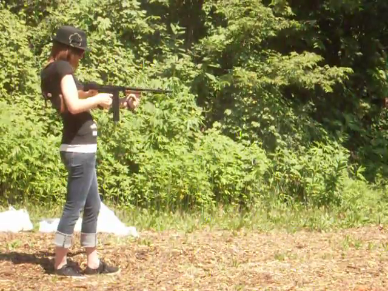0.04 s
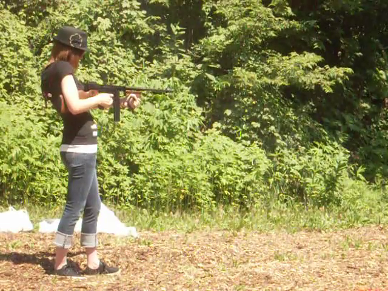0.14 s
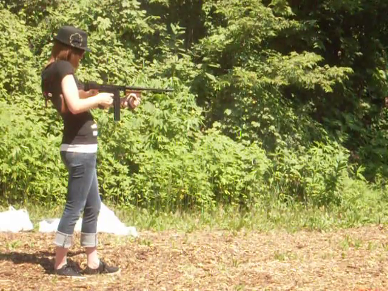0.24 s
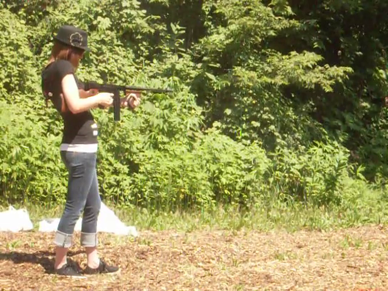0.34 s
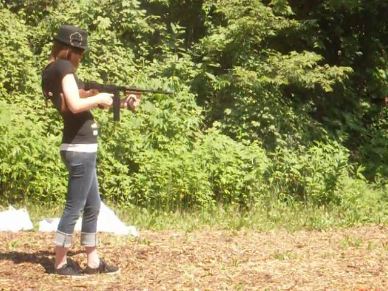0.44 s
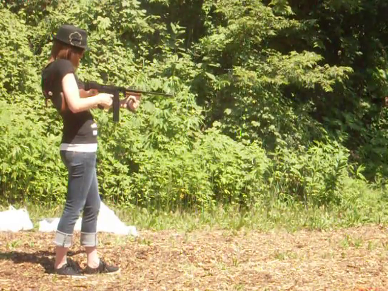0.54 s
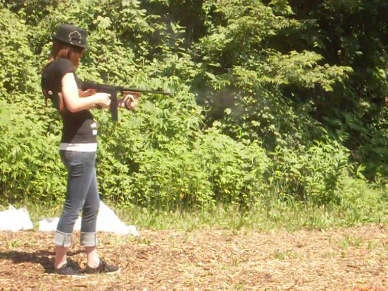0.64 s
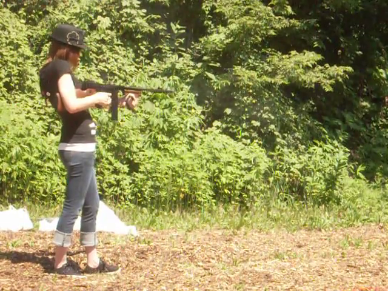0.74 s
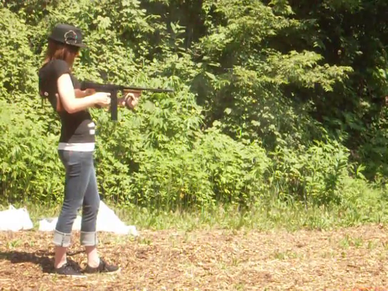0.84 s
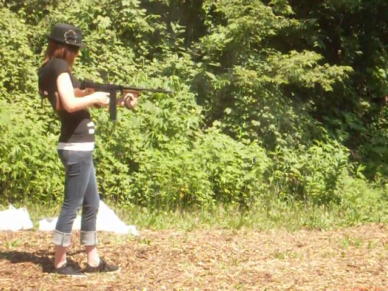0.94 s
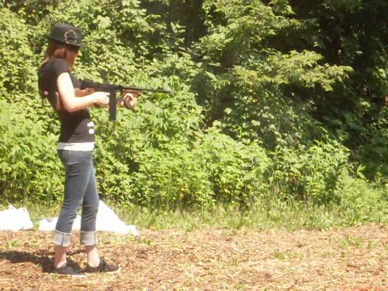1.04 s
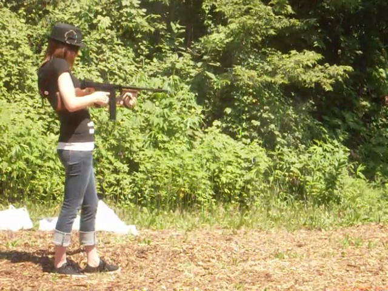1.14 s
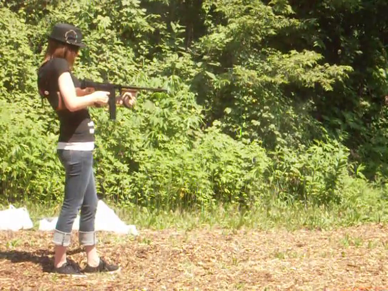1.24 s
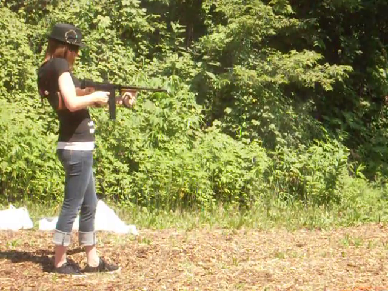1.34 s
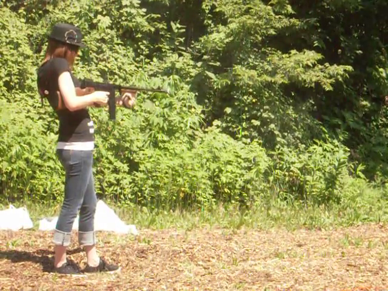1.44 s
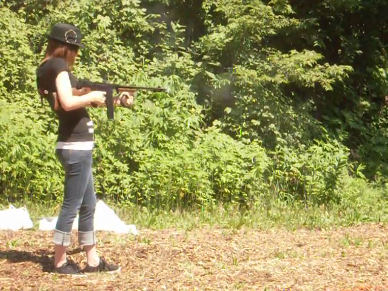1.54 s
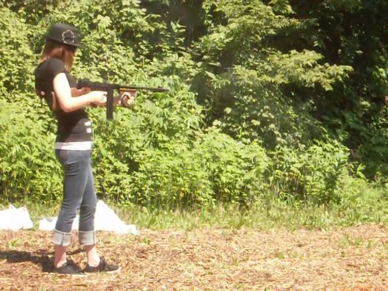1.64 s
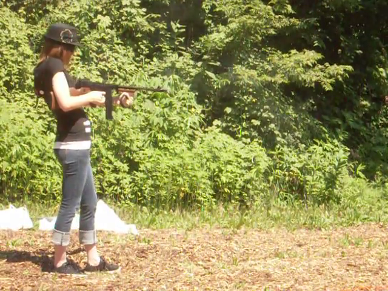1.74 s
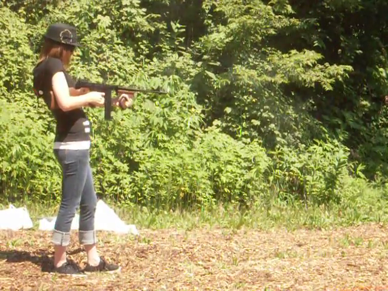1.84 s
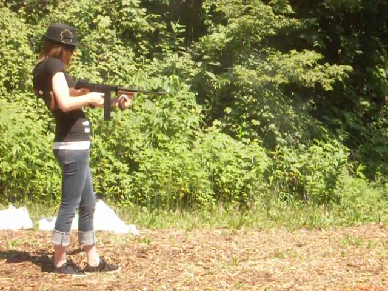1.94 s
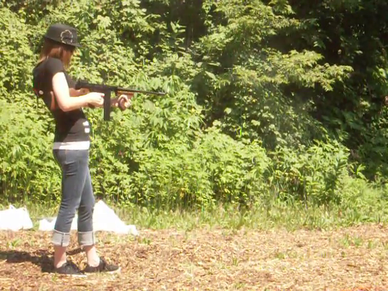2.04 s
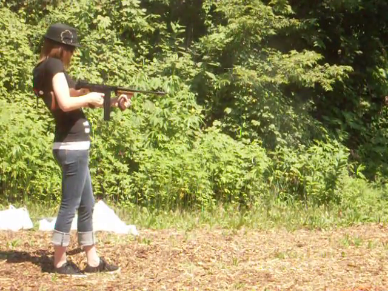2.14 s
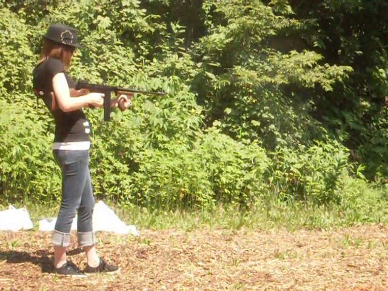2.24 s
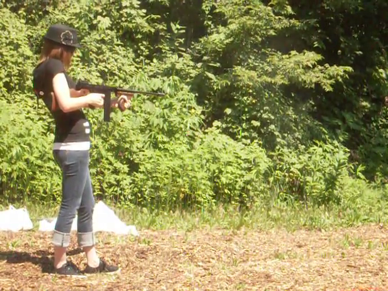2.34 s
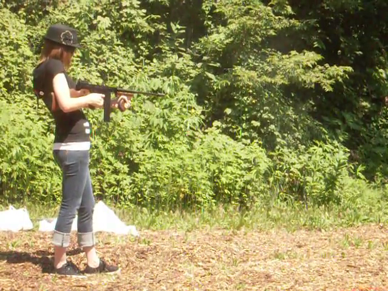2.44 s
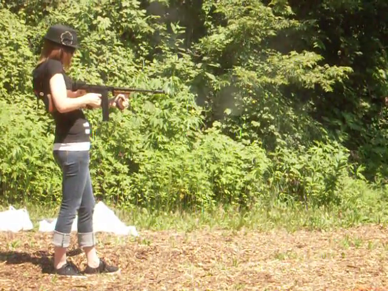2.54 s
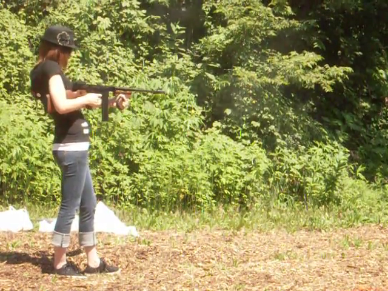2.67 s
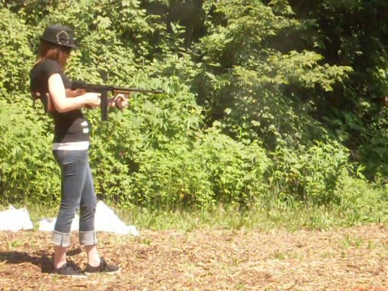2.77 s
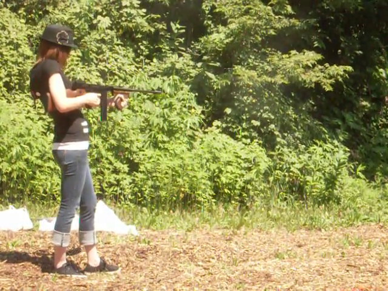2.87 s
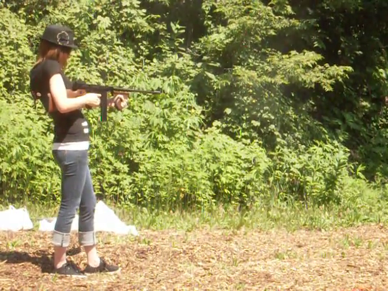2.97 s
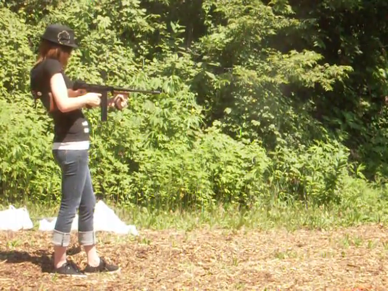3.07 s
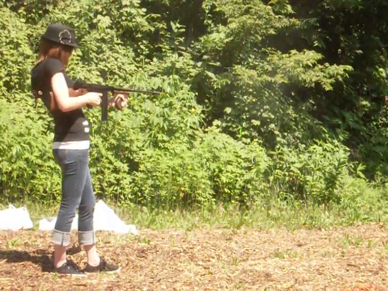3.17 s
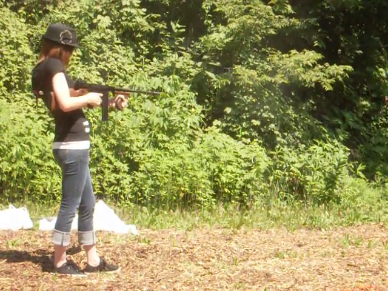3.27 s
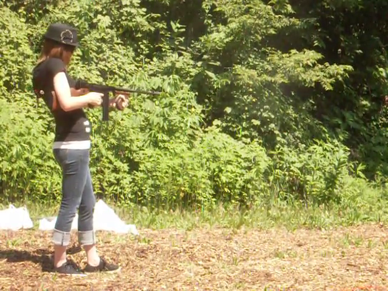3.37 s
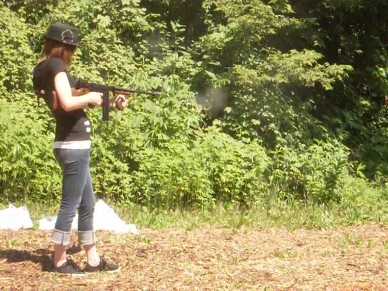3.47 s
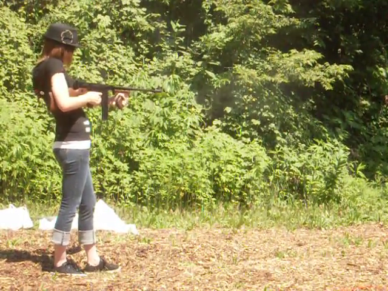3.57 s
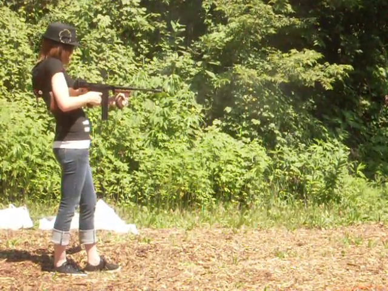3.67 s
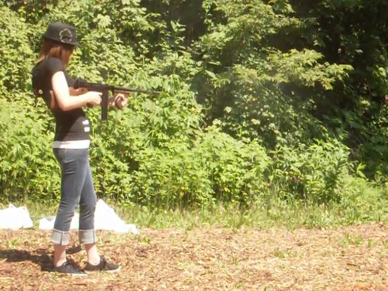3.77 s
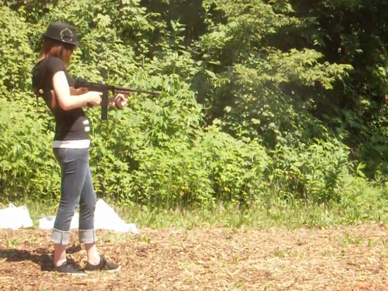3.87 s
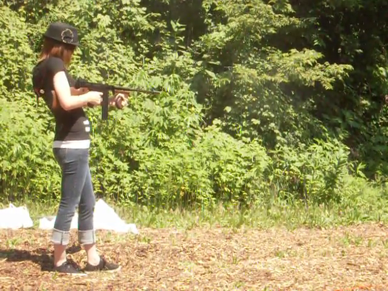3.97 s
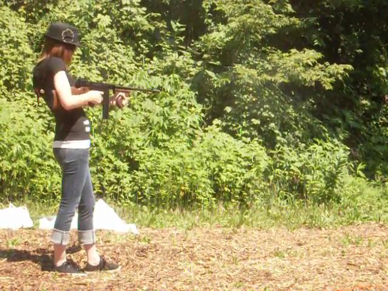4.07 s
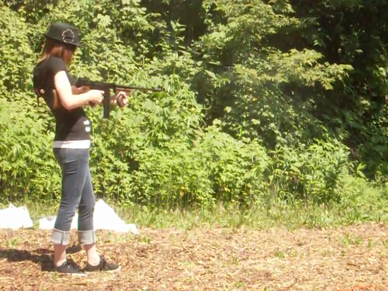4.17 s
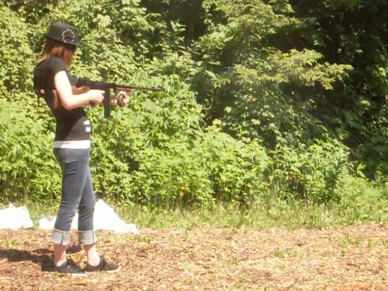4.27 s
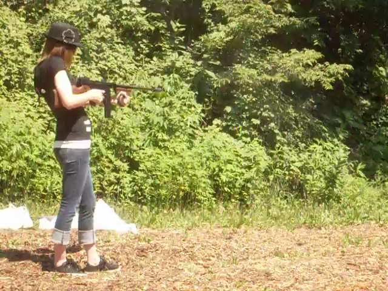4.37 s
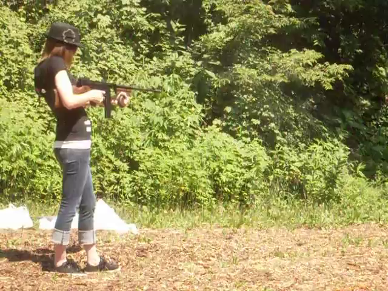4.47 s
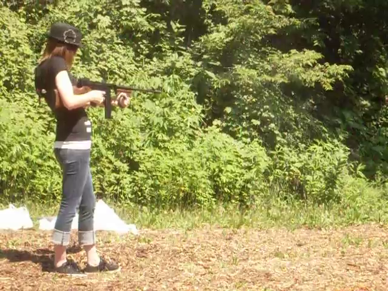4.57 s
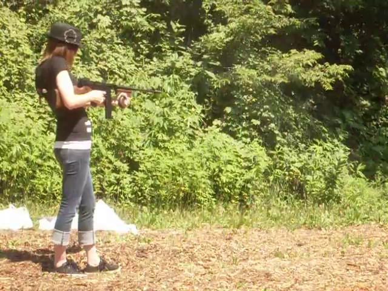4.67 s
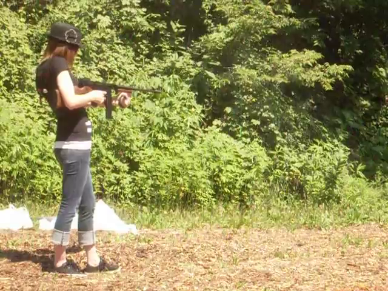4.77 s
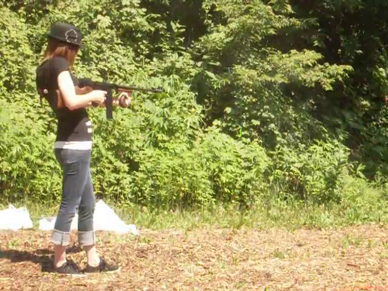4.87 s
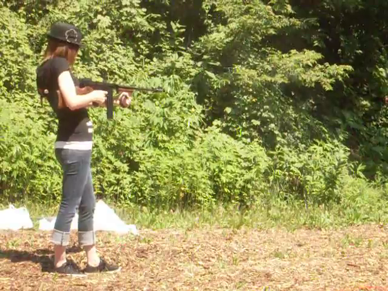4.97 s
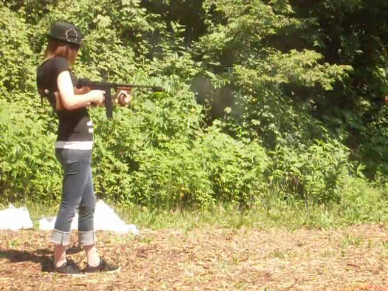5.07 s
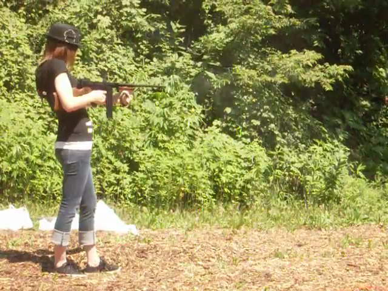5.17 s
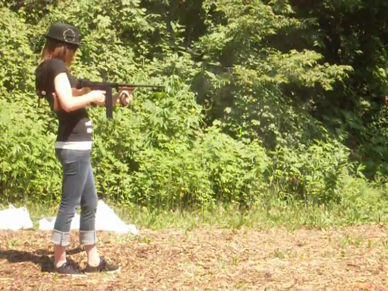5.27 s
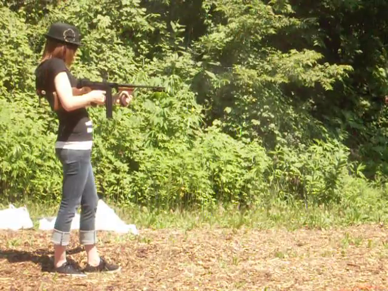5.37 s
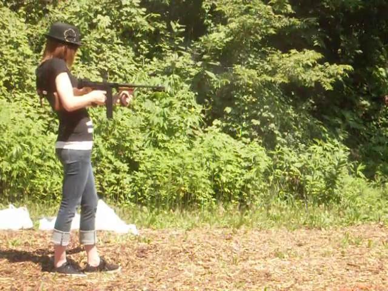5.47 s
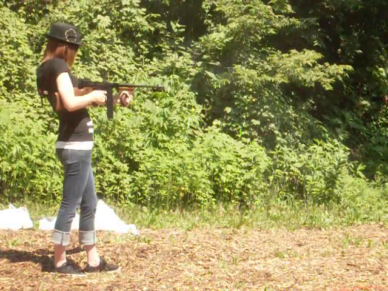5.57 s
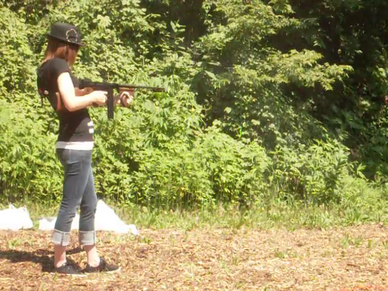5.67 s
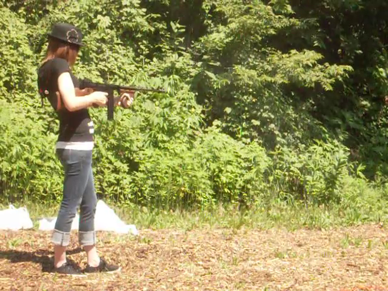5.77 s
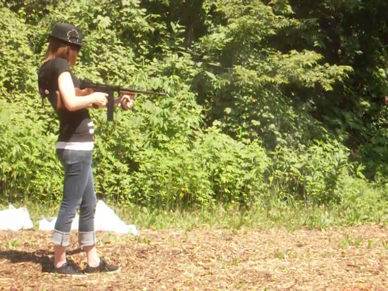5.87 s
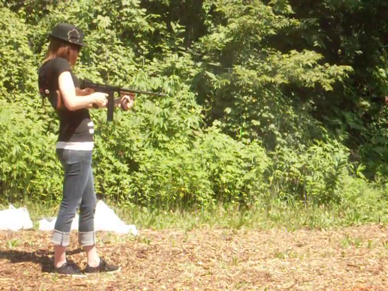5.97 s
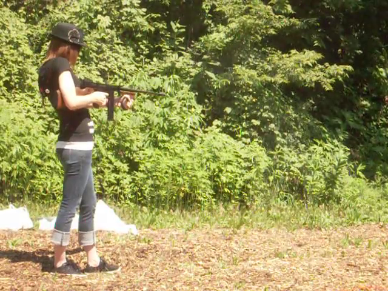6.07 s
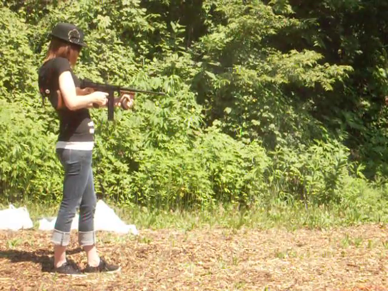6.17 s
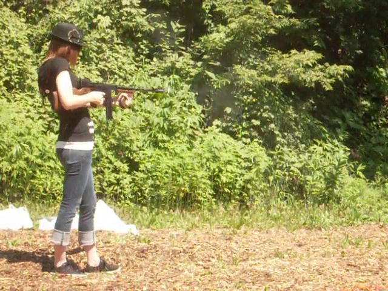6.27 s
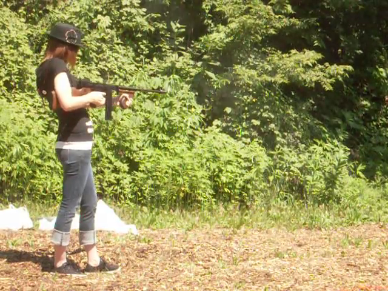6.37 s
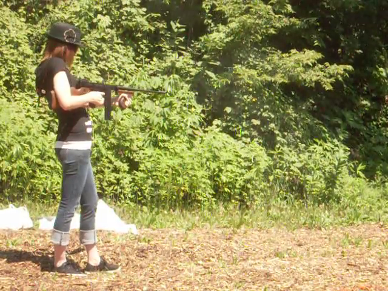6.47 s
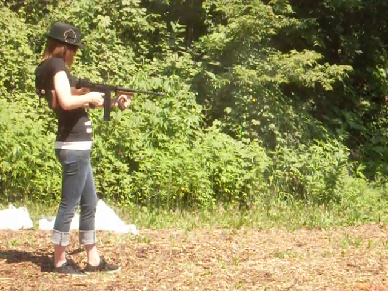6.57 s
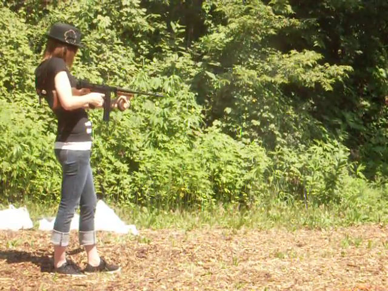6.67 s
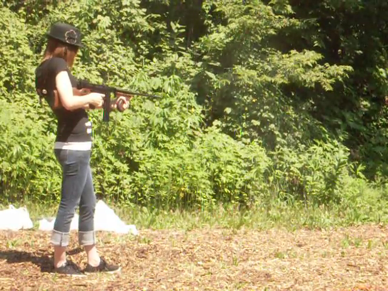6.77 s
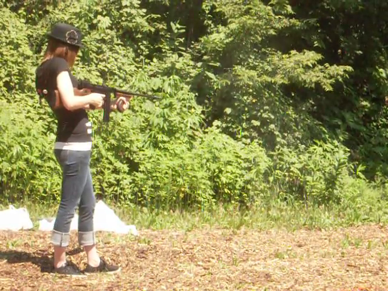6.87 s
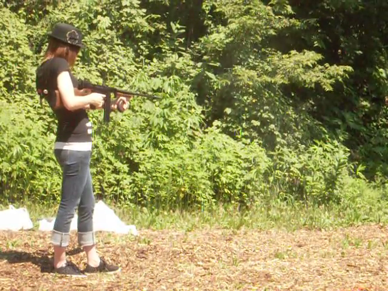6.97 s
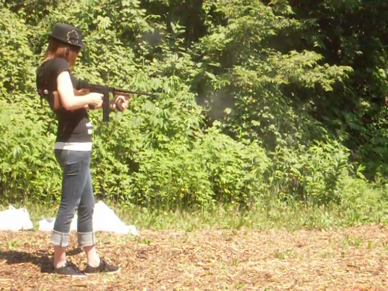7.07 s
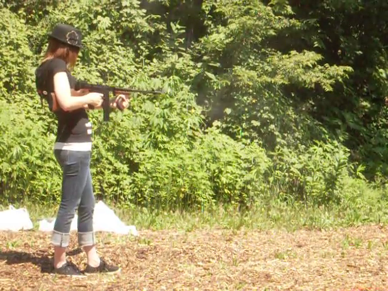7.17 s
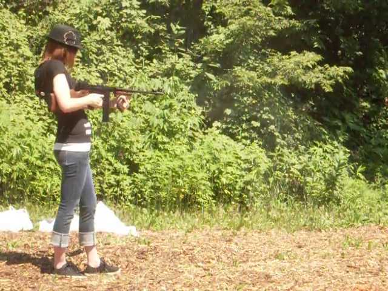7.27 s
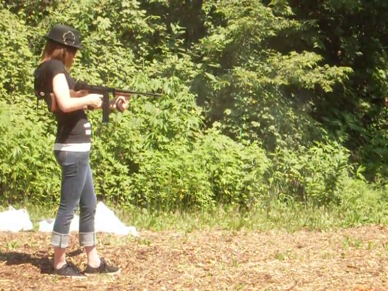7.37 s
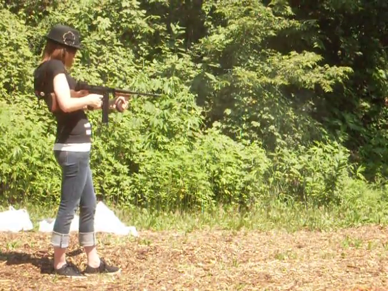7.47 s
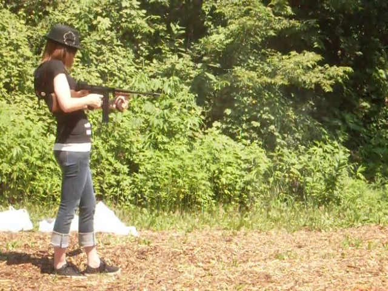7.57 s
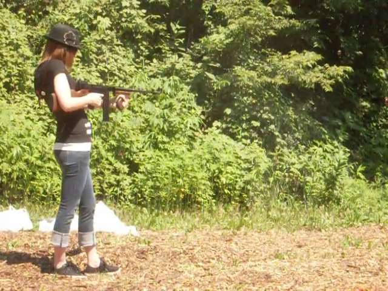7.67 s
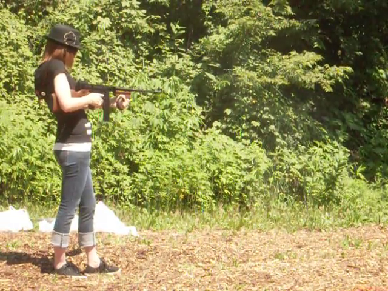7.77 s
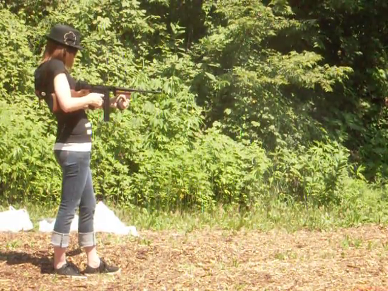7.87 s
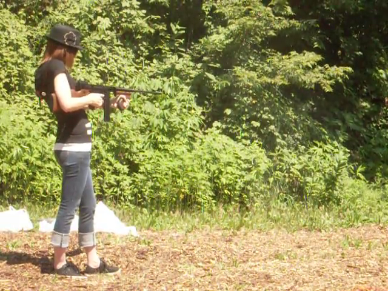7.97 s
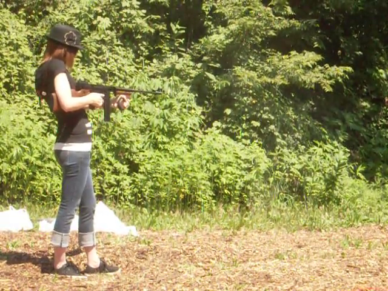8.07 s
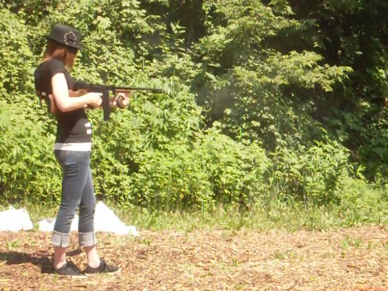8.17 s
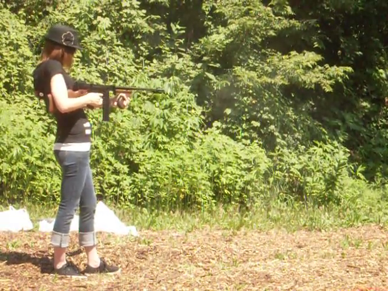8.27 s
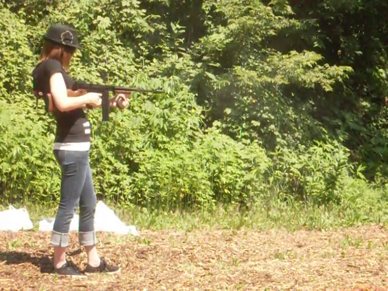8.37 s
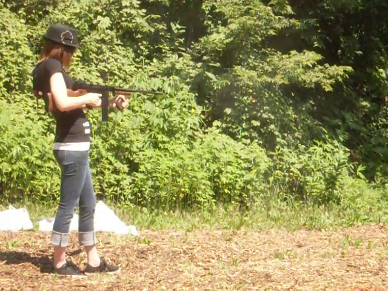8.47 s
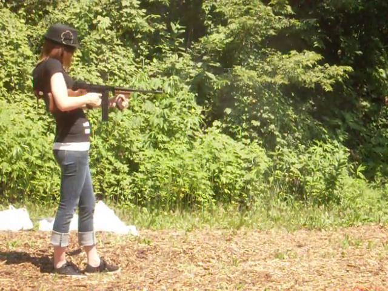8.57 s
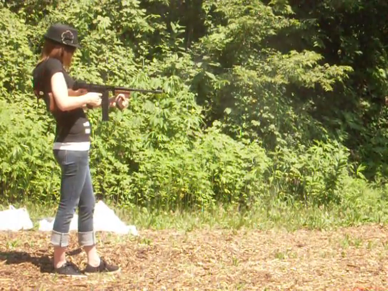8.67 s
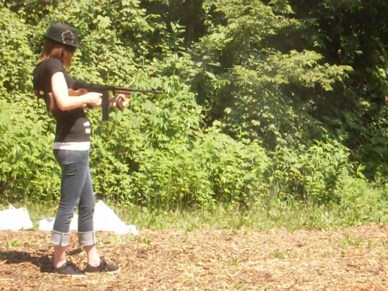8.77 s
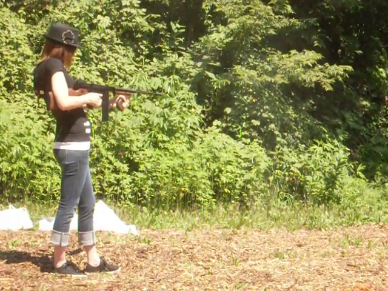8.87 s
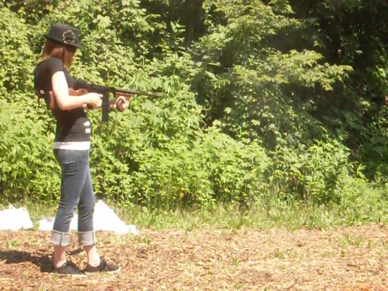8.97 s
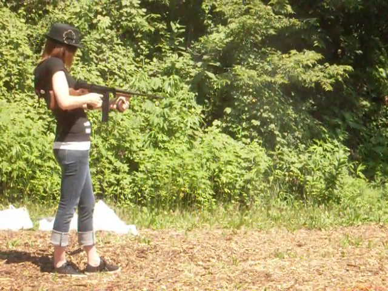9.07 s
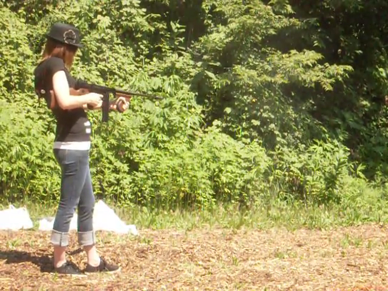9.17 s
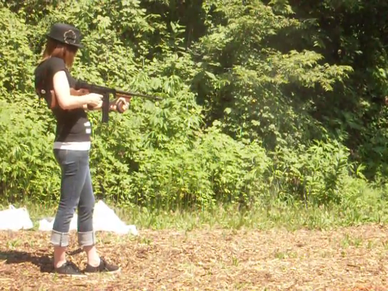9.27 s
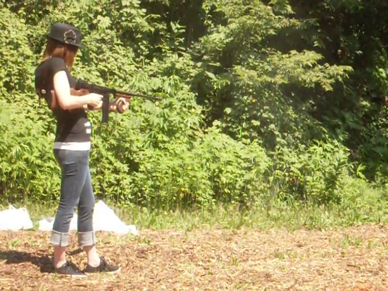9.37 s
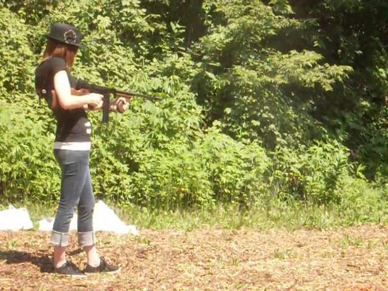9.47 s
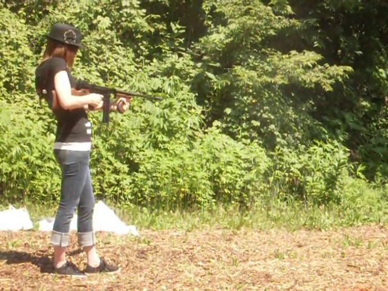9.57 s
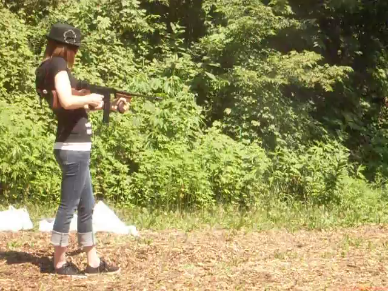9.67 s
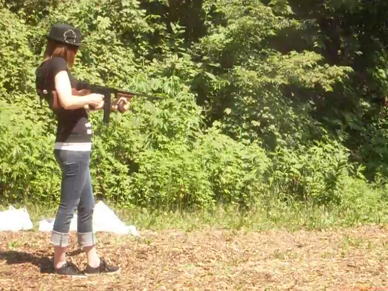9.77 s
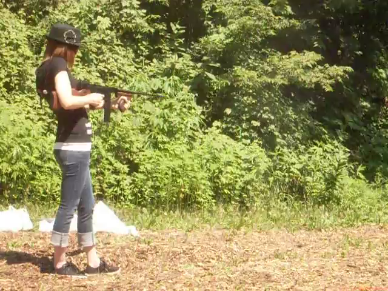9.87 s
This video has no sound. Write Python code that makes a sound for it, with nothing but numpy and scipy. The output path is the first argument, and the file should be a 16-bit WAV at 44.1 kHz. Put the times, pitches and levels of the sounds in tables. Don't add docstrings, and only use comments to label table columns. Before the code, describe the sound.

A short-barrelled gun fires eight separate sharp cracks outdoors, each echoing off bank and trees, over faint hiss and thin electronic whine.

```python
import sys
import numpy as np
from scipy import signal
from scipy.fft import rfft, irfft
from scipy.io import wavfile

SR = 44100
rng = np.random.default_rng(int(sys.argv[2]) if len(sys.argv) > 2 else 0)


def digitize_waveform(pressure):
    field = np.atleast_2d(pressure).T
    bounded = np.clip(field, -1, 1)
    quanta = np.round(bounded * 32767).astype(np.int16)
    wavfile.write(sys.argv[1], SR, quanta)


def volts_from_db(level):
    exponent = np.asarray(level, float) / 20
    return 10 ** exponent


N = 437022

# start in seconds, charge in dB, change of the bank's slap in dB, bullet strike in dB.
SHOTS = [
    (0.6747, -1.34, -0.5, -13),
    (1.5501, 0, -3.5, 1.5),
    (2.5483, -1.16, 0, -15.5),
    (3.5202, -1.45, -1, -7.5),
    (5.0934, -1.2, -2, -8),
    (6.2918, -0.9, -3, -1),
    (7.1345, -1.04, 0, -10.5),
    (8.148, -0.43, -2.5, -15.5),
]
# delay in seconds, thump in dB, thump pitch in Hz, thump t60 in seconds, crackle in dB.
MUZZLE = [(.0001, -5, 2189, .004, -3.5), (.0006, -9.5, 50.05, 0.063, -32), (.0008, -8, 139.1, .039, -29),
          (.0015, -6, 1764, 0.0033, -8), (.0027, 11.5, 762, .0078, -4.5), (.0038, -1, 1492, 0.018, -3),
          (.004, -17.5, 330, 0.046, -30.5), (.0004, -3, 3000, .006, -28.5)]
BANK = [(.0565, 2.5, 3000, 0.0065, -8.5), (.0564, -0.5, 1425, 0.012, -13), (.0568, 9, 984, 0.0062, -20.5),
        (.0594, -0.5, 820, 0.02, -24)]
# delay in seconds, thump in dB, thump pitch in Hz, crackle in dB.
NEARBY = [(.0073, -2, 906, -19.5), (0.0123, 3.5, 815, -28), (0.0114, -8, 3000, -6), (.0162, -0.5, 783, -8),
          (0.0239, -8.5, 804.7, -8), (0.0297, -16.5, 1100, -9.5), (.033, -4, 780, -13.5),
          (0.041, -21.5, 330, -21.5), (0.0507, -12.5, 1212, -18)]
# delay in seconds, size in dB, thump pitch in Hz.
TRUNKS = [(.097, 4, 850), (.125, 5, 1450), (0.135, -3.5, 1310), (.164, -2.5, 540), (.166, 5, 930),
          (0.168, -7, 1490), (.283, -4, 810), (0.304, 4, 1460), (.333, 1, 1500), (.358, 2, 900),
          (0.362, -2, 1500), (0.412, 1, 1330), (.418, -4, 790), (.447, -6, 850), (.488, -10, 950),
          (.516, -3, 1400), (0.571, 6, 1420), (.579, 1, 860), (.648, -7, 850), (.664, 8, 840),
          (.682, 3, 890)]
# pitch in Hz, share of power 0-1.
REPEATS = [(60, .8), (300, .93), (1000, .75), (2000, .38), (4000, .08), (8000, .02)]
# pitch in Hz, level in dB, hold after the blast in seconds, then t60 in seconds.
BUSHES = [(60, -36.5, .01, 0.26), (150, -35.5, 0.014, .35), (330, -33, 0.044, .3),
          (650, -30.5, 0.055, 0.46), (1590, -31, 0.083, .21), (3500, -22, 0.069, .3),
          (6800, -30.5, 0.032, .4), (11000, -22, 0.044, .4)]
# pitch in Hz, level in dB a quarter second after the blast, t60 in seconds.
FOREST = [(110, -66.5, 2.1), (300, -57, 1), (634, -48, 2.1), (1500, -46.5, 2.0), (2400, -46, 1.7),
          (4200, -46.5, 1.35), (6507, -56, 0.98), (11000, -53, .8)]
# time after the blast in seconds, half-width in seconds,
# level change in dB.
GAPS = [(.009, .003, -3.5), (.021, .003, -5), (0.048, 0.0076, 0), (0.065, .004, -3.5), (.092, .006, 3)]
# pitch in Hz, lift in dB, width in octaves.
GROUND = [(152, 2, 0.9), (850, 5, 0.13), (1500, 2.5, 0.18), (5600, 7.5, 0.27)]
# start in seconds, peak in dB, dull ring in Hz, brass ring in dB, bright tick in dB.
CASES = [(2.4513, -55.5, 3800, -30, -2), (4.179, -60, 2940, -30, .5), (5.855, -74, 4400, -24.5, 3),
         (6.0064, -52.5, 3770, -24, -11), (6.1675, -43.5, 4200, -40.5, -6),
         (7.0967, -56.5, 4500, -31.5, -2), (7.999, -52.5, 3800, -25, 7.5), (9.0413, -53, 4280, -30, -2),
         (9.2835, -52.5, 4320, 1, -7), (9.3214, -69, 4170, 8, -3)]
# pitch in Hz, level in dB, t60 in seconds.
BRASS = [(10900, -2.5, .17), (11150, -4.5, .17)]
# start in seconds, length in seconds, first pitch in Hz, last pitch in Hz, level in dB.
CHIRPS = [(1.45, 0.034, 3400, 4200, -63), (7.955, 0.023, 3400, 4200, -67), (8.027, 0.024, 2800, 2700, -67),
          (8.099, 0.025, 3390, 4300, -62), (9.48, .05, 3500, 3800, -74), (9.536, .025, 3100, 3270, -73),
          (9.712, .02, 3450, 2996, -71), (9.808, 0.023, 4300, 4080, -67.5), (9.82, .022, 3810, 3000, -67),
          (9.873, 0.041, 2910, 3700, -64)]
# pitch in Hz, rms level in dB.
TONES = [(2543.4, -87), (5086.8, -74.5), (8813, -86.5), (10173.6, -93.5)]
# time in seconds, pitch in Hz.
WHINE = [(0, 1924), (.28, 1806), (.53, 1840), (.58, 1420), (.65, 1585), (1.45, 1912), (4.3, 1706),
         (4.8, 1628), (5.06, 1772), (5.9, 1855), (6.14, 2087), (6.27, 1788), (8.06, 2004), (9.0, 1880),
         (9.44, 1942), (9.5, 2045), (9.67, 1837), (9.8, 2005)]
# frequency in Hz, density in dB per Hz.
AIR = [(20, 14), (150, 4), (500, 0.5), (1000, -1), (2200, -7), (5500, -12), (10300, -13), (12500, -30.5)]

STRIKE_S, STRIKE_HZ, STRIKE_T60_S = .0735, 846, .016
CRACKLE_T60_S = .011
NEARBY_CYCLES, TRUNK_CYCLES = 4.2, 25
TRUNK_DB, TRUNK_FADE_DB_PER_S = -13.5, 55
TRUNK_CRACKLE_DB, TRUNK_DULLING_DB_PER_S = -3, 155.5
LUMP_DB, LUMP_FADE_S, FAR_LUMP_DB = 2.4, .12, 1.1
SPREAD_DB, FOREST_EDGE_S = 4, 0.089
LEAF_RISE_S, LEAF_GAP_DB = 0.054, -6.5
BOLT_S, BOLT_DB = .0145, -56.5
TICK_HZ = 8300
CARRIER_HZ, BEAT_HZ, BEAT_TROUGH_S = 7643.4, 13.41, 4.738
AIR_DB = -69
OVERLOAD, SHAVE, ATTACK_S = .78, .74, .0025


def rms_one(x):
    return x / np.sqrt(np.mean(x ** 2, axis=-1, keepdims=True) + 1e-20)


def at_hz(points, hz):
    points = np.array(points)
    return np.interp(np.log(hz), np.log(points[:, 0]), points[:, 1])


def drift(rate_hz, size):
    r = np.exp(-2 * np.pi * rate_hz / SR)
    wander = signal.lfilter([1], [1, -2 * r, r * r], rng.standard_normal(size + SR))
    return rms_one(wander[SR:])


def ring(hz, t60_s, size):
    t = np.arange(size) / SR
    return np.sin(2 * np.pi * hz * t) * volts_from_db(-60 * t / t60_s)


def band(x, low_hz, high_hz):
    return signal.sosfilt(signal.butter(2, [low_hz, high_hz], "band", fs=SR, output="sos"), x)


def add(out, sound, start_s):
    at = round(start_s * SR)
    out[at:at + len(sound)] += sound[:len(out) - at]


def blast():
    out = np.zeros(N)
    t = np.arange(1800) / SR
    rows = arrivals()
    swell = 1 - np.exp(-t / 0.0004)
    for start_s, charge_db, slap_db, strike_db in SHOTS:
        strike = -volts_from_db(strike_db) * swell * ring(STRIKE_HZ, STRIKE_T60_S, len(t))
        add(out, strike, start_s + STRIKE_S)
        noise = rng.standard_normal((len(rows), len(t)))
        crackle = rms_one(band(noise, 1000, 9800)) * volts_from_db(-60 * t / CRACKLE_T60_S)
        vary = rng.standard_normal((len(rows), 2))
        for k, (row, burst, (gain, shift)) in enumerate(zip(rows, crackle, vary)):
            delay_s, thump_db, hz, t60_s, crackle_db = row
            thump = -swell * ring(hz * (1 + 0.0077 * shift), t60_s, len(t))
            sound = volts_from_db(thump_db + 0.75 * gain) * thump + volts_from_db(crackle_db) * burst
            level_db = charge_db + slap_db * (k < len(BANK))
            add(out, volts_from_db(level_db) * sound, start_s + delay_s + 4e-5 * shift)
    return out


def arrivals():
    nearby = [(s, db, hz, NEARBY_CYCLES / hz, crackle_db) for s, db, hz, crackle_db in NEARBY]
    trunks = []
    for delay_s, size_db, hz in TRUNKS:
        thump_db = TRUNK_DB + size_db - TRUNK_FADE_DB_PER_S * delay_s
        dulling_db = TRUNK_DULLING_DB_PER_S * (delay_s - TRUNKS[0][0])
        crackle_db = thump_db + TRUNK_CRACKLE_DB - dulling_db
        trunks.append((delay_s, thump_db, hz, TRUNK_CYCLES / hz, crackle_db))
    return BANK + MUZZLE + nearby + trunks


def woods():
    size, count = round(1.35 * SR), len(SHOTS)
    white = rng.standard_normal((2, count + 1, size))
    edges_hz = 56 * 2 ** np.arange(0, 7.9, 1 / 3)
    t = np.arange(size) / SR
    trunks = drift(35, size)
    near_lump_db = LUMP_DB * np.exp(-t / LUMP_FADE_S)
    tails = 0
    for k, (low_hz, high_hz) in enumerate(zip(edges_hz, edges_hz[1:])):
        hz = np.sqrt(low_hz * high_hz)
        same, *own = rms_one(band(white[k % 2], low_hz, high_hz))
        share = at_hz(REPEATS, hz)
        lump_db = (near_lump_db + FAR_LUMP_DB * share) * min(hz / 600, 1) * trunks
        scatter = np.sqrt(share) * same + np.sqrt(1 - share) * np.array(own)
        tails = tails + volts_from_db(scatter_db(hz, t) + lump_db) * scatter
    out = np.zeros(N)
    for (start_s, charge_db, *_), tail in zip(SHOTS, tails):
        add(out, volts_from_db(charge_db) * tail, start_s)
    return out


def scatter_db(hz, t):
    bush_hz, *bush = np.transpose(BUSHES)
    forest_hz, *forest = np.transpose(FOREST)
    bush_db, hold_s, bush_t60_s = (at_hz(list(zip(bush_hz, column)), hz) for column in bush)
    forest_db, forest_t60_s = (at_hz(list(zip(forest_hz, column)), hz) for column in forest)
    leaf_db = LEAF_GAP_DB * min(hz / 4000, 1) * np.exp(-(t / LEAF_RISE_S) ** 2)
    near_db = bush_db - 60 * np.maximum(t - hold_s, 0) / bush_t60_s + leaf_db
    spread_db = SPREAD_DB * np.log2(np.maximum(t, FOREST_EDGE_S) / .25)
    far_db = forest_db - 60 * (t - .25) / forest_t60_s - spread_db
    ground_db = sum(db * np.exp(-.5 * (np.log2(hz / at) / width) ** 2) for at, db, width in GROUND)
    gaps_db = sum(db * np.exp(-((t - s) / width) ** 2) for s, width, db in GAPS)
    return 10 * np.log10(volts_from_db(2 * near_db) + volts_from_db(2 * far_db)) + ground_db + gaps_db


def bolt():
    out = np.zeros(N)
    t = np.arange(round(BOLT_S * SR)) / SR
    for start_s, *_ in SHOTS:
        scrape = rms_one(band(rng.standard_normal(len(t)), 700, 7000))
        add(out, scrape * volts_from_db(BOLT_DB + 5.5 * (t / BOLT_S) ** 3), start_s - BOLT_S)
    return out


def cases():
    out = np.zeros(N)
    t = np.arange(6000) / SR
    brass = sum(volts_from_db(level_db) * ring(hz, t60_s, len(t)) for hz, level_db, t60_s in BRASS)
    for start_s, peak_db, hz, brass_db, tick_db in CASES:
        noise = rng.standard_normal(len(t))
        knock = 6.8 * (t / 0.00094) ** 2 * ring(hz, 0.0028, len(t))
        knock += 2.7 * band(noise * volts_from_db(-60 * t / 0.021), 0.73 * hz, 1.2 * hz)
        tick = 1.6 * band(noise * volts_from_db(tick_db - 60 * t / .012), .72 * TICK_HZ, 1.35 * TICK_HZ)
        add(out, volts_from_db(peak_db + 1.0) * (knock + tick + volts_from_db(brass_db) * brass), start_s)
    return out


def bird():
    out = np.zeros(N)
    for start_s, length_s, from_hz, to_hz, level_db in CHIRPS:
        along = np.linspace(0, 1, round(length_s * SR))
        hz = from_hz + (to_hz - from_hz) * along ** 2
        hz = hz + 60 * drift(150, len(hz))
        swell = np.sin(np.pi * along ** 1.4) ** 2
        whistle = np.sin(2 * np.pi * np.cumsum(hz) / SR)
        add(out, volts_from_db(level_db) * swell * whistle, start_s)
    return out


def camera():
    t = np.arange(N) / SR
    out = sum(volts_from_db(level_db + 3) * np.sin(2 * np.pi * hz * t) for hz, level_db in TONES)
    carrier = 2 * np.pi * CARRIER_HZ * t
    neighbour = carrier - 2 * np.pi * BEAT_HZ * (t - BEAT_TROUGH_S)
    out += volts_from_db(-64.5) * (np.sin(carrier) - volts_from_db(-11.5) * np.sin(neighbour))
    hz = np.interp(t, *np.transpose(WHINE)) + 60 * drift(87, N) + 28 * drift(22, N)
    whine = 2 * np.pi * np.cumsum(hz) / SR
    mirrors = volts_from_db(-7.0) * np.sin(carrier + whine) + volts_from_db(-19.0) * np.sin(carrier - whine)
    return out + volts_from_db(-73 + 0.77 * drift(30, N)) * (np.sin(whine) + mirrors)


def air():
    hz = np.maximum(np.arange(N // 2 + 1) * SR / N, 1)
    hiss = irfft(rfft(rng.standard_normal(N)) * volts_from_db(at_hz(AIR, hz)), N)
    return volts_from_db(AIR_DB + 0.52 * drift(2.5, N)) * rms_one(hiss)


def limiter(x, knee_db, release_db_per_s):
    ramp_db = release_db_per_s * np.arange(N) / SR
    over_db = np.maximum(20 * np.log10(np.abs(x) + 1e-9) - knee_db, 0)
    held_db = np.maximum.accumulate(over_db + ramp_db, axis=-1) - ramp_db
    r = np.exp(-1 / (ATTACK_S * SR))
    return x * volts_from_db(-.8 * signal.lfilter([1 - r], [1, -r], held_db))


def scene():
    return (blast() + woods() + bolt() + cases() + bird() + camera() + air())[None]


def low_pass(x):
    return signal.sosfilt(signal.butter(12, 16980, fs=SR, output="sos"), x)


def record(dry):
    capsule = signal.sosfilt(signal.butter(1, 250, "high", fs=SR, output="sos"), dry)
    limited = limiter(capsule, knee_db=-3.0, release_db_per_s=899.5)
    clipped = np.clip(limited, -OVERLOAD, OVERLOAD)
    cut = signal.sosfiltfilt(signal.butter(4, 10600, fs=SR, output="sos"), clipped)
    cut = signal.sosfiltfilt(signal.cheby2(10, 32, 12700, fs=SR, output="sos"), cut)
    shaved = np.clip(cut, -SHAVE, SHAVE)
    finished = signal.sosfiltfilt(signal.cheby2(10, 35, 16400, fs=SR, output="sos"), shaved)
    return low_pass(finished)


dry = scene()
out = record(dry)
digitize_waveform(out)
```